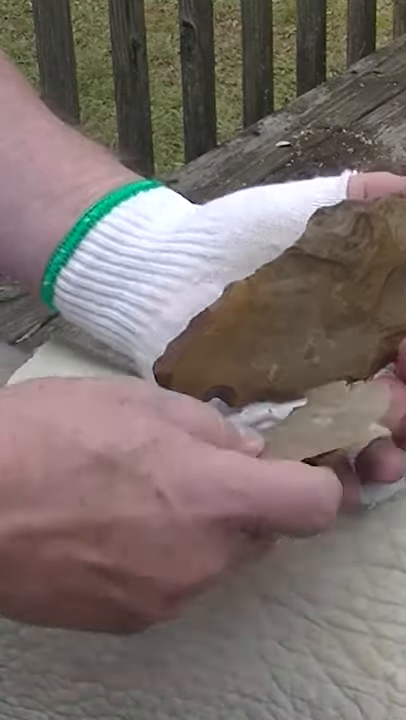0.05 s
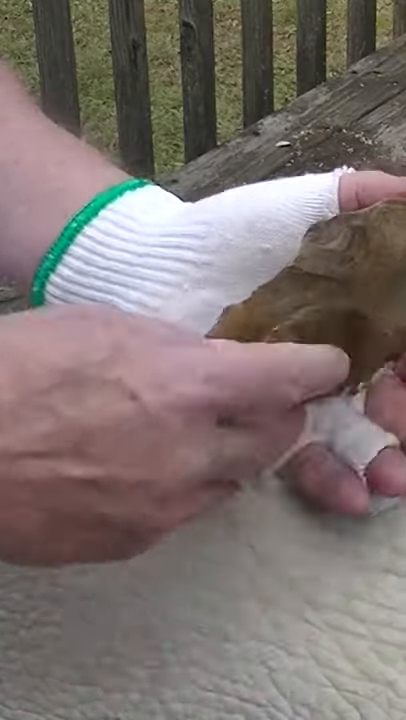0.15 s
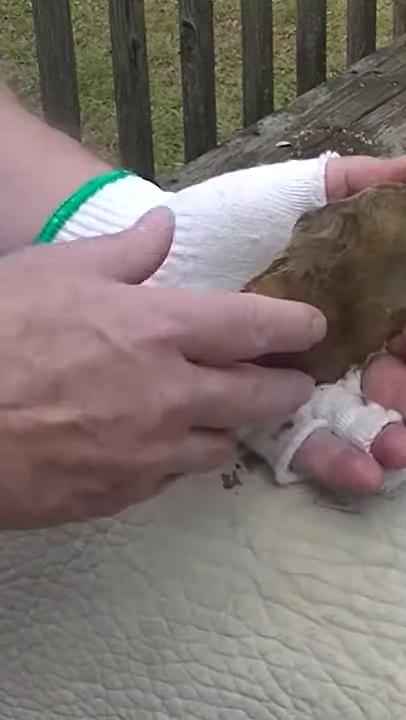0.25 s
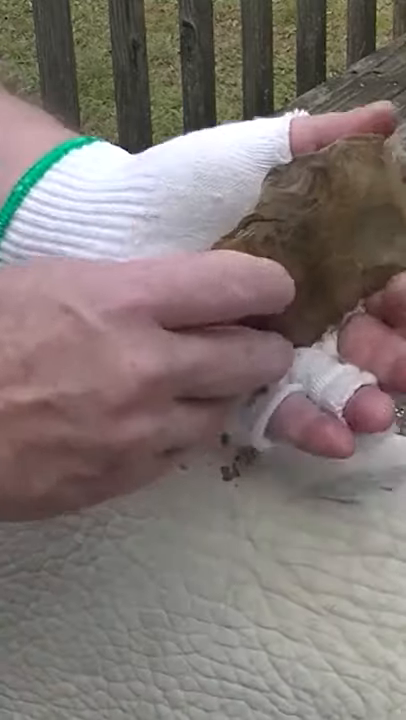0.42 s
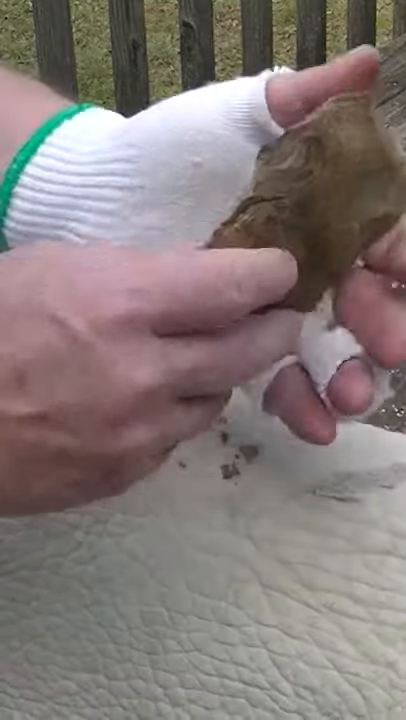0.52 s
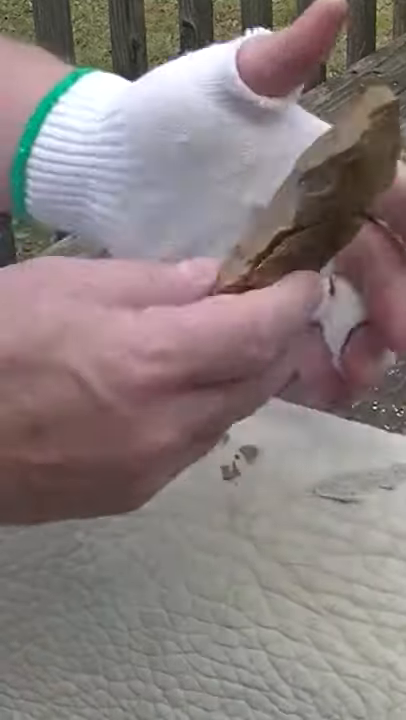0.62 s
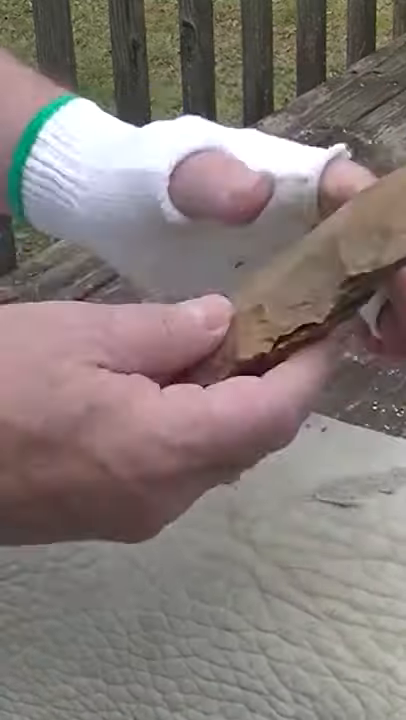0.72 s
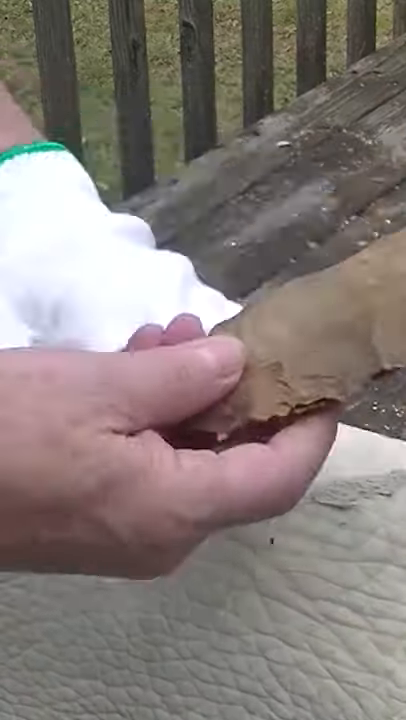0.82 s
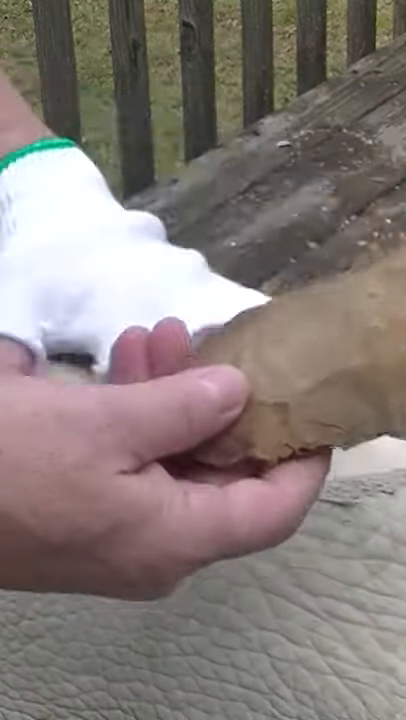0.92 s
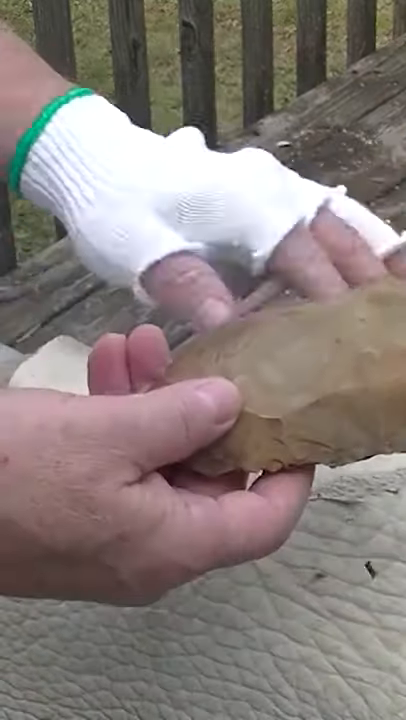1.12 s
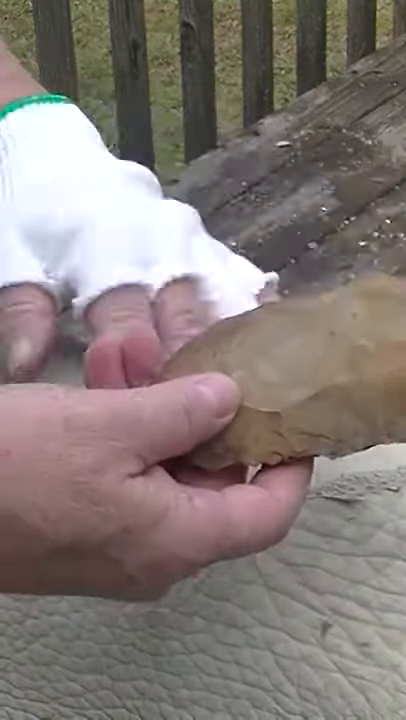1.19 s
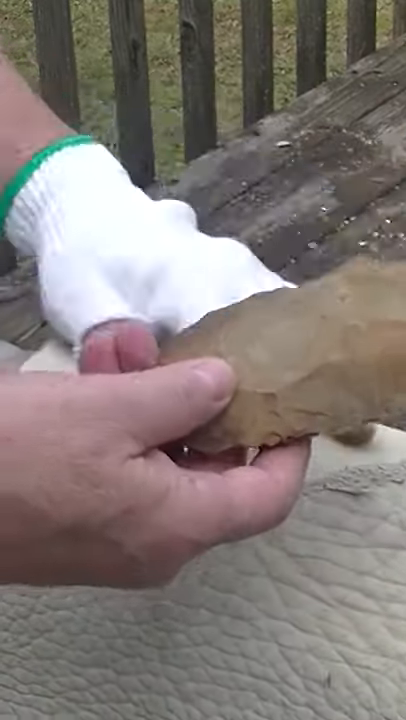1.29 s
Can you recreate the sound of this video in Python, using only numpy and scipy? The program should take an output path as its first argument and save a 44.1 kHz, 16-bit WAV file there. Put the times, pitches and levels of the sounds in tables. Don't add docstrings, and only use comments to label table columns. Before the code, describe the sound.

Flint knocks on flint, close to a stereo microphone outdoors. After quiet air, a sharp click at 0.24 s starts a gritty rattle; the hardest crack comes at 0.31, another at 0.36, with last knocks near 0.41 before the grip mutes the glassy ring. A crumb ticks at 0.56, a distant bird chirps at 0.88, fingers rub softly around 0.95-1.15, and a chip drops on leather at 1.26 over faint traffic and leaves.

```python
import sys
import numpy as np
from scipy import signal
from scipy.fft import rfft, irfft, next_fast_len
from scipy.io import wavfile
from scipy.ndimage import uniform_filter1d, map_coordinates

SR = 44100
rng = np.random.default_rng(int(sys.argv[2]) if len(sys.argv) > 2 else 0)


def elevation(decibels):
    levels = np.asarray(decibels, float)
    return 10 ** (levels / 20)


def waveform_to_disk(signal):
    frames = np.transpose(np.atleast_2d(signal))
    scaled = np.clip(frames, -1, 1) * 32767
    samples = np.round(scaled).astype(np.int16)
    wavfile.write(sys.argv[1], SR, samples)


N = 59535

# (frequency [Hz], t60 [s], level [dB], left over right [dB])
FLAKE_MODES = [(4863, .15, 0, 2), (8122, .115, 3, 6), (8999, .085, 3, -5.5), (10810, .06, 0, 0),
               (12590, .08, -8, 1), (13400, .07, 3, 2)]
GRIP_S = .416
GRIPPED = .35
TIME = np.arange(N) / SR
SIDES = np.array([[.5], [-.5]])


def unit(x):
    return x / np.sqrt(np.mean(x ** 2) + 1e-20)


def along(points, hz):
    f, v = np.transpose(points)
    return np.interp(np.log(hz + 1), np.log(f + 1), v)


def level(rows):
    s, db = np.transpose(rows)
    return elevation(np.interp(TIME, s, db, left=-120, right=-120))


def wobble(rate):
    knots = rng.standard_normal(int(N * rate / SR) + 4)
    return map_coordinates(knots, [np.arange(N) * rate / SR])


def filtered(x, response):
    m = next_fast_len(N + SR // 4)
    return irfft(rfft(x, m) * response(np.fft.rfftfreq(m, 1 / SR)), m)[..., :N]


def resonances(rows):
    def response(f):
        total = 0
        for k, (hz, width, db) in enumerate(rows):
            total = total + (-1) ** k * elevation(db) * 1j * f * width / (hz * hz - f * f + 1j * f * width)
        return total
    return response


def add_ring(out, s, hz, db, t60, attack_s, pan_db=0, lead=0):
    start = round(s * SR)
    t = np.arange(min(int(1.2 * t60 * SR) + 8, N - start)) / SR
    decay = elevation(db + SIDES * pan_db - 60 * t / t60)
    swing = np.sin(2 * np.pi * hz * t + SIDES * lead)
    out[:, start:][:, :len(t)] += decay * (1 - np.exp(-t / attack_s)) * swing


def strike(modes, hits):
    out = np.zeros((2, N))
    for s, hit_db in hits:
        for (hz, db, t60), u in zip(modes, rng.standard_normal(len(modes))):
            add_ring(out, s + abs(u) / hz, hz, hit_db + db + 1.5 * u, t60, .0003, 2 * u, u / 3)
    return out


def grains(count, spread_db):
    place, sign, size = rng.random((count, 3)).T
    size = np.sign(sign - .5) * elevation(-spread_db * np.log(size))
    return unit(np.bincount((place * N).astype(int), size, N))


def scattered_tail(sample_count, t60):
    t = np.arange(sample_count) / SR
    noise = rng.standard_normal((3, len(t)))
    return t, (noise[0] + .5 * noise[1:]) * elevation(-60 * t / t60)


def clicks():
    # (centre [s], peak [dB],
    # pitch [Hz], width [ms])
    contacts = [(0.2376, -5.2, 2830.0, 0.45), (0.2425, -20.6, 2670.0, 0.68), (0.2467, -25.8, 2750.0, 0.57),
                (0.2501, -20.4, 2330.0, 0.63), (0.2536, -24.3, 2250.0, 0.86), (0.2557, -16.7, 2610.0, 0.57),
                (0.2584, -14.8, 2620.0, 0.54), (0.2613, -24.4, 2610.0, 0.52), (0.2633, -24.0, 2390.0, 0.66),
                (0.2682, -25.0, 2770.0, 0.54), (0.273, -26.8, 2620.0, 0.68), (0.2756, -23.2, 2530.0, 0.63),
                (0.2829, -24.3, 2790.0, 0.5), (0.287, -25.1, 2390.0, 0.63), (0.3032, -22.9, 2920.0, 0.48),
                (0.3145, 1.5, 4580.0, 0.57), (0.322, -18.7, 2900.0, 0.7), (0.3303, -11.7, 3730.0, 0.39),
                (0.3573, -2.0, 3570.0, 0.36), (0.3643, -20.1, 3780.0, 0.57), (0.3708, -14.1, 3260.0, 1.0),
                (0.3769, -17.8, 3640.0, 0.39), (0.3845, -19.6, 3580.0, 0.39), (0.3911, -15.4, 3090.0, 1.11),
                (0.3929, -17.2, 2990.0, 0.73), (0.4004, -16.1, 3030.0, 0.68), (0.4069, -11.8, 3590.0, 0.41),
                (0.409, -8.2, 3790.0, 0.39), (0.4127, -6.5, 3160.0, 0.95),
                (.2373, -17, 9000, .45), (.2869, -28, 9700, .5), (.3151, -3, 4500, .8), (.3152, -9, 2400, 1.6),
             (.4567, -25.4, 2910, .79), (.4677, -29.5, 2660, .66), (.5194, -26.9, 2610, .61),
             (.5589, -31.4, 2730, .57), (.8816, -34.3, 2580, .48), (.9676, -32, 3260, .52),
             (.9856, -31, 3350, 2.6), (1.2783, -38, 3900, .4), (1.2578, -24.5, 4670, 2.6),
             (1.2562, -36, 2500, .3), (.2374, -23, 6500, .6), (.2374, -29, 14800, .35),
             (.2378, -18, 1950, 1.0), (.3148, -9, 5500, .6), (.3147, -24, 14000, .3),
             (.3152, -11, 3250, 1.3), (.3575, -25, 9300, .7), (.3985, -33, 9300, 1.2),
             (.9793, -36, 3100, .6), (1.0392, -34, 3200, 1.0), (1.0672, -35, 3400, .3),
             (1.0985, -33, 2800, 1.0), (1.1022, -36, 2600, .9), (1.1072, -34, 2500, .9),
             (1.1202, -35, 2600, .7), (.2378, -32, 480, 1.6)]
    events = contacts
    out = np.zeros((2, N))
    ms = np.arange(-150, 150) / SR * 1000
    for (s, db, hz, width), z in zip(events, rng.standard_normal((len(events), 3))):
        bell = np.exp(-np.log(16) * (ms / (width * np.where(ms > 0, 1.3, .75))) ** 2)
        side_phase = SIDES * hz / 14000 * (1 + z[2] / 3)
        swing = np.sin(2 * np.pi * hz * ms / 1000 + 0.31 * z[0] + side_phase)
        swing = swing + elevation(-14) * np.sin(2 * np.pi * hz * 0.73 * ms / 1000 + z[1])
        crack = elevation(db - 5) * np.exp(-((ms + width / 3) / .025) ** 2)
        pan = elevation(-.8 * SIDES * (1 + z[2]))
        out[:, round(s * SR) - 150:][:, :300] += elevation(db - 1.2) * (bell * swing * pan + crack)
    return filtered(out, lambda f: 1j * f / (450 + 1j * f))


def flake():
    # (time [s], low mode [dB], second [dB], third [dB], top modes [dB])
    rings = [(.2372, -35, -36, -29, -46), (.246, -50, -50, -32, -52), (.2613, -50, -60, -40, -62),
             (.2757, -52, -50, -39, -66), (.287, -48, -60, -31, -52), (.3145, -38, -34, -16, -44),
             (.3175, -60, -32, -60, -60), (.3215, -45, -29, -45, -38), (.330, -28, -36, -38, -46),
             (.3572, -38, -44, -28, -39), (.3655, -29, -52, -50, -60), (.390, -38, -58, -43, -57),
             (.4065, -32, -46, -38, -47), (.9845, -37, -75, -75, -80)]
    grip_t60_s, loose = .03, .65
    out = np.zeros((len(FLAKE_MODES), 2, N))
    for s, low_db, second_db, third_db, top_db in rings:
        hits_db = [low_db, second_db, third_db, top_db, top_db, top_db]
        late = rng.random(len(FLAKE_MODES))
        for row, (hz, t60, db, pan_db), hit_db, u in zip(out, FLAKE_MODES, hits_db, late):
            in_step = np.ceil(s * hz + u / 5) / hz
            left_s = t60 * (loose if s > GRIP_S else 1)
            add_ring(row, in_step, hz, db + hit_db, left_s, .0004, pan_db, u - .5)
    held = np.clip(TIME - GRIP_S, 0, 1)
    mute = elevation(-60 * held / grip_t60_s)
    low = out[0] * np.where(held < .5, mute ** GRIPPED, 1)
    return low + out[1:].sum(0) * mute


def larger_flint():
    # (frequency [Hz], level [dB], t60 [s])
    modes = [(6500, -6, .008), (8161, -6, .047), (8608, -12, .09), (9195, -10, .07), (9862, -14, .055),
             (10820, -6, .055), (11860, -18, .02), (12580, -20, .08)]
    # (time [s], level [dB])
    hits = [
        (.237, -29),
        (.3145, -36),
        (.4085, -38),
    ]
    return strike(modes, hits)


def chatter():
    # (time [s], level [dB])
    rattle = [
        (.2372, -33),
        (.25, -41),
        (.285, -47.5),
        (.31, -46.5),
    ]
    # (time [s], level [dB])
    slide = [
        (.3145, -29),
        (.37, -35),
        (.412, -25.5),
        (.42, -39),
        (.45, -49),
        (.458, -42.5),
        (.475, -54),
        (.5, -60),
        (.6, -53),
    ]
    # (frequency [Hz], width [Hz], level [dB])
    stone_peaks = [(1900, 300, -2), (2500, 500, -2), (3250, 700, 0), (4300, 700, -11), (6500, 2500, -26),
                   (10000, 4000, -25)]

    def stone(f):
        return resonances(stone_peaks)(f) * (1j * f / (1300 + 1j * f)) ** 4 / (1 + (f / 13800) ** 16)

    drive = grains(count=2600, spread_db=2.4)
    drive = drive + .35 * rng.standard_normal(N) + .35 * rng.standard_normal((2, N))
    drive = drive * (level(rattle) + level(slide)) / np.std(filtered(drive, stone))
    modes = []
    for hz, t60, db, _ in FLAKE_MODES:
        width_hz = 3 * np.log(1000) / np.pi / t60
        modes.append((hz, width_hz, db - 8 - hz / 1800))
    ring = filtered(drive, resonances(modes)) * np.where(TIME < GRIP_S, 1, GRIPPED)
    return filtered(drive, stone) * elevation([[-.6], [.6]]) + ring


def rub():
    # (time [s], level [dB], share of the lower cupped-hand colour [0-1])
    strokes = [(.8, -62, .3), (.946, -60, .3), (.953, -52, .3), (.967, -48, .2), (.99, -46, .1),
               (1.0, -52, .1), (1.016, -54, .1), (1.038, -43, .2), (1.047, -51, .3), (1.068, -44, .2),
               (1.08, -53, .1), (1.092, -46, .3), (1.1, -41, .8), (1.113, -43, 1), (1.126, -49, 1),
               (1.146, -53, 1), (1.152, -62, 1), (1.17, -70, 1)]
    # (frequency [Hz], level [dB per Hz])
    skin = [(880, -65), (1500, -7.5), (2460, -2.5), (3410, -5), (4370, -12), (4830, -7.5), (5660, -13),
            (16000, -33.5)]
    cup_hz, open_hz, cup_wide_hz = 2550, 3300, 1500
    late_s, late_db, sheen_db = 1.335, -49, -1.5

    def hand(hz):
        def response(f):
            hollow = .3 + 1 / (1 + ((f - hz) / cup_wide_hz * 2) ** 2)
            return elevation(along(skin, f)) * (f > 900) / (1 + (f / 6000) ** 2) * hollow
        return response

    drive = grains(count=9000, spread_db=2.2)
    drive = drive + .35 * rng.standard_normal((2, N)) + .7 * rng.standard_normal(N)
    drive = drive * elevation(2 * wobble(200))
    s, db, cupped = np.transpose(strokes)
    cupped = np.interp(TIME, s, cupped, right=.5)
    closed_hand = unit(filtered(drive, hand(cup_hz)))
    open_hand = unit(filtered(drive[:, ::-1], hand(open_hz)))
    rough = np.sqrt(cupped) * closed_hand + np.sqrt(1 - cupped) * open_hand
    stroke = level(list(zip(s, db))) + level([(late_s, late_db), (N / SR, late_db)])
    hiss = rng.standard_normal((2, N)) + rng.standard_normal(N)
    sheen = unit(filtered(hiss, lambda f: elevation(along(skin, f)) * f / (f + 6000)))
    smooth_stroke = uniform_filter1d(stroke, SR // 40)
    return (rough * stroke + elevation(sheen_db) * sheen * smooth_stroke) * elevation([[-.5], [.5]])


def chip():
    # (frequency [Hz], level [dB], t60 [s])
    modes = [(4522, -12, .04), (4673, -5, .04), (5033, -4, .045), (5330, -8, .06), (5652, -13, .04),
             (6686, -15, .05), (7041, -4, .04), (7400, -17, .11), (8457, -12, .012), (9700, -20, .05),
             (10690, -16, .05), (10990, -6, .037), (12390, -5, .04)]
    # (time [s], level [dB])
    hits = [
        (1.256, -31),
        (1.2612, -41),
        (1.2645, -45),
        (1.2688, -44),
        (1.2722, -45),
    ]
    rest_s, rest_db = 1.2738, -9
    out = strike(modes, hits)
    start = round(hits[0][0] * SR)
    t = np.arange(SR // 10) / SR
    fizz = rng.standard_normal((2, len(t))) * (elevation(-60 * t / .005) + elevation(-13 - 60 * t / .05))
    out[:, start:][:, :len(t)] += elevation(-28) * np.diff(fizz, prepend=0)[:, :N - start]
    return out * elevation(rest_db * np.clip((TIME - rest_s) * 500, 0, 1))


def crumb():
    # (frequency [Hz], level [dB], t60 [s])
    modes = [(2050, -47, .04), (10410, -48, .03), (11470, -44, .012), (13700, -42, .02)]
    # (time [s], level [dB])
    hits = [
        (.5455, -9),
        (.5587, 0),
    ]
    return strike(modes, hits)


def yard(x):
    t, tail = scattered_tail(SR // 8, t60=.055)
    tail = tail * (t > .0015)
    tail = tail / np.linalg.norm(tail[0])
    return elevation(-16) * signal.fftconvolve(x.mean(0)[None], tail, axes=1)[:, :N]


def bird():
    start_s, length_s, glide_s = .883, .028, .011
    from_hz, to_hz = 6200, 7800
    t = np.arange(round(length_s * SR)) / SR
    hz = to_hz + (from_hz - to_hz) * np.exp(-t / glide_s)
    note = np.sin(np.pi * np.sqrt(t / length_s)) * np.sin(2 * np.pi * np.cumsum(hz) / SR)
    _, tail = scattered_tail(SR // 3, t60=.38)
    tail = elevation(4) * tail / np.linalg.norm(tail[0])
    tail[:, 0] += 1
    call = signal.fftconvolve(note[None], tail, axes=1)
    return elevation(-43.5) * np.pad(call, ((0, 0), (round(start_s * SR), N)))[:, :N]


def air():
    # (frequency [Hz], level [dB per Hz])
    colour = [(15, -44), (25, -5), (118, -8.5), (203, -1.5), (267, -4.5), (412, -6.5), (1520, -10.5),
              (15000, -35.5), (16700, -55)]
    # (frequency [Hz], correlation [0-1])
    alike = [(60, 0.93), (380, 0.99), (2380, 0.92), (15000, 0.037)]
    z = signal.stft(rng.standard_normal((2, N)), nperseg=512)[2]
    patches = uniform_filter1d(rng.standard_normal(z.shape[1:]), 6, 0)
    patches = uniform_filter1d(patches, 12, 1)
    pair = signal.istft(z * elevation(1.04 * unit(patches)), nperseg=512)[1][:, :N]

    def mid_side(hz):
        turn = np.arccos(np.clip(along(alike, hz), -1, 1)) / 2
        return elevation(along(colour, hz)) * [np.cos(turn), np.sin(turn)]

    mid, side = filtered(pair, mid_side)
    stereo = unit(np.array([mid + side, mid - side]))
    return elevation(-49.5 + 0.12 * wobble(7.4)) * stereo * elevation([[.4], [-.4]])


def scene():
    stones = clicks() + flake() + larger_flint() + chatter() + chip() + crumb()
    return stones + yard(stones) + rub() + bird() + air()


def empty_bands(x):
    # (start [s], end [s], low edge [Hz], high edge [Hz])
    bands = [
        (.2415, .309, 13800, 20000),
        (.319, .47, 14000, 20000),
        (.245, .308, 5150, 6100),
        (.245, .258, 11400, 12300),
        (.291, .309, 11800, 13100),
        (.405, .47, 12700, 13100),
    ]
    for start, end, low_hz, high_hz in bands:
        shut = uniform_filter1d(1. * ((TIME > start) & (TIME < end)), SR // 300)
        x = x - shut * filtered(x, lambda f: (f > low_hz) & (f < high_hz))
    return x


def low_pass(x):
    return signal.sosfilt(signal.butter(12, 16840, fs=SR, output="sos"), x)


def record(dry):
    def microphone(hz):
        return (hz < 16800) * (1j * hz / (50 + 1j * hz)) ** 2 / (1 + (hz / 15400) ** 24)

    x = dry / (1 + np.abs(dry / 1.2) ** 4) ** (1 / 4)
    mix = empty_bands(filtered(x, microphone))
    return low_pass(mix)


dry = scene()
out = record(dry)
waveform_to_disk(out)
```